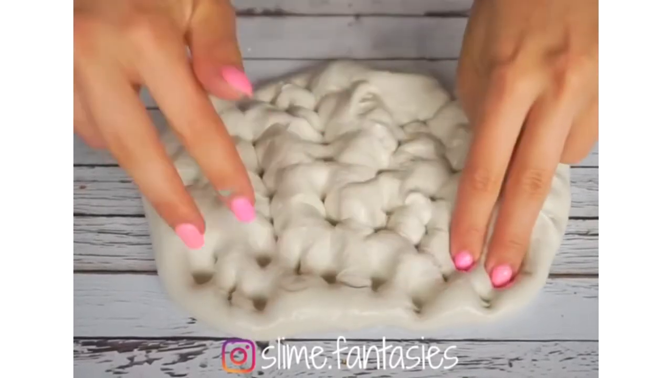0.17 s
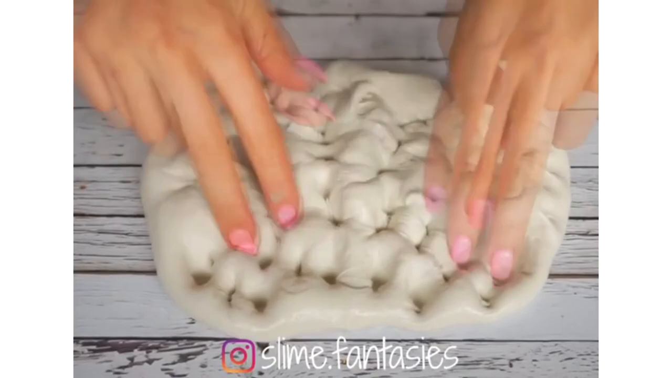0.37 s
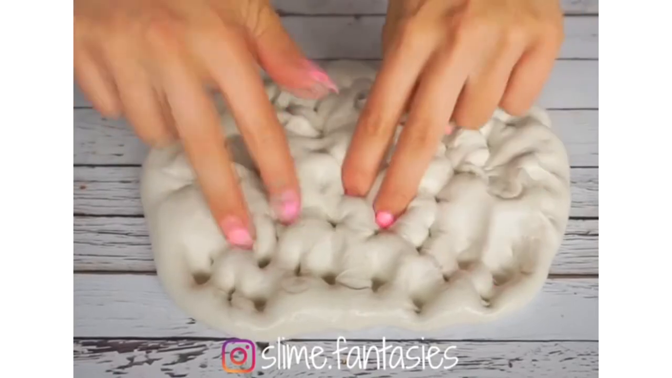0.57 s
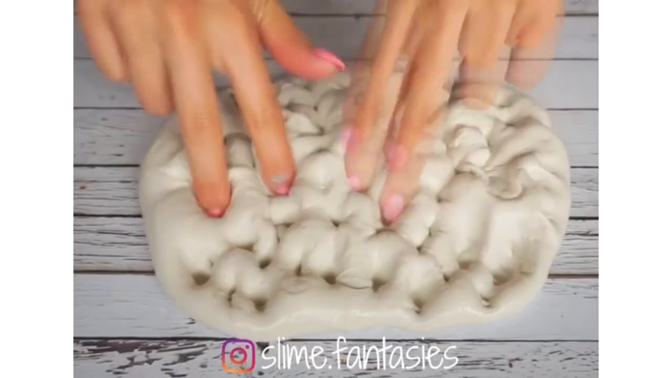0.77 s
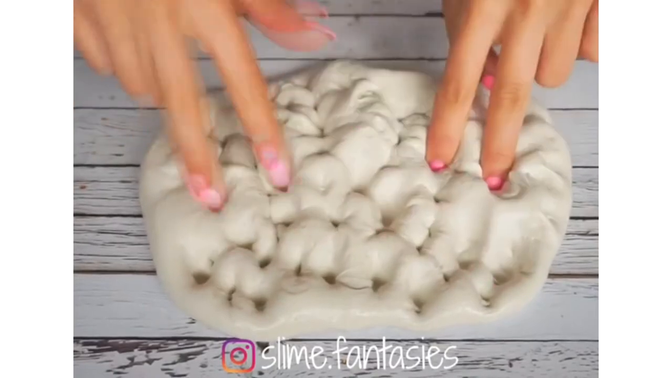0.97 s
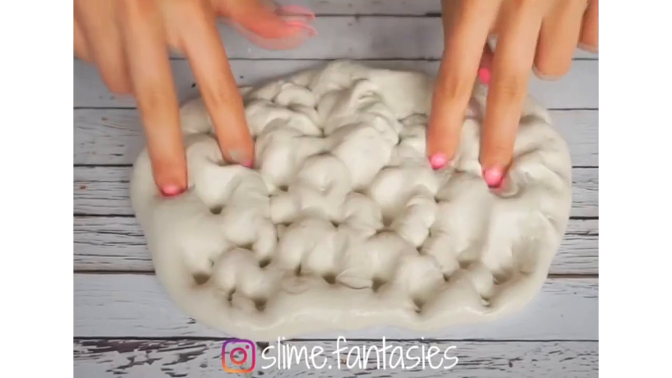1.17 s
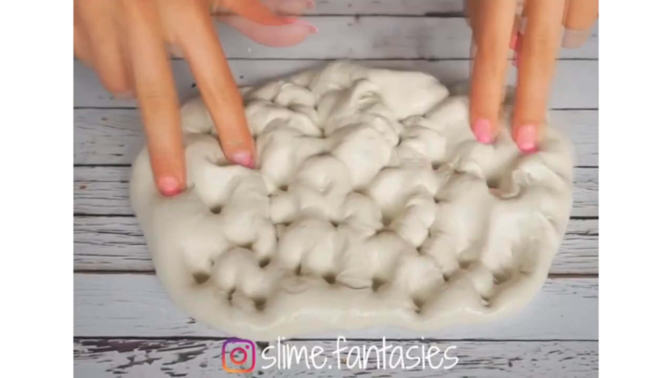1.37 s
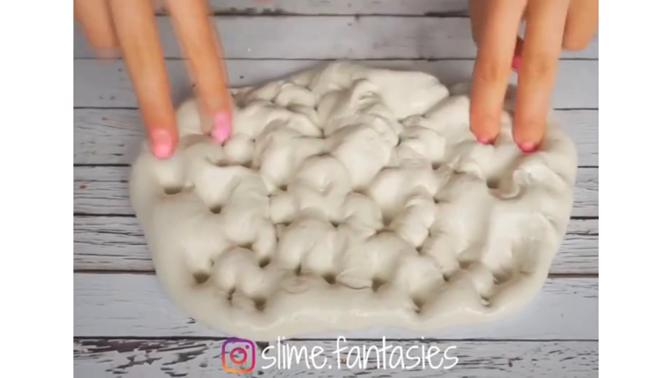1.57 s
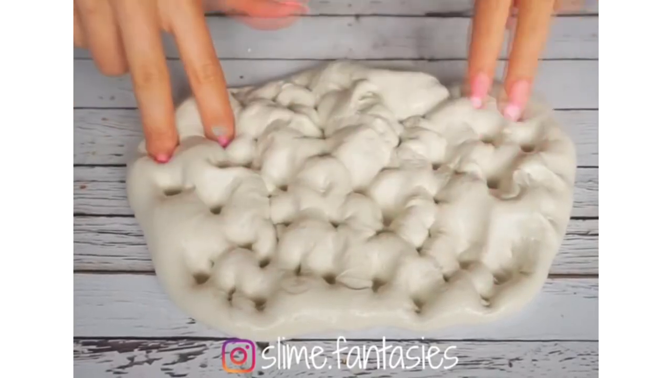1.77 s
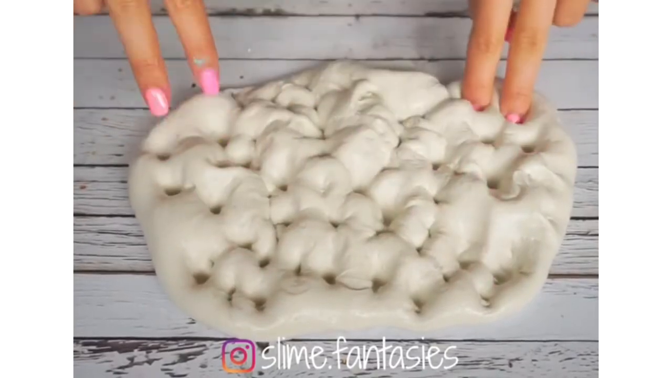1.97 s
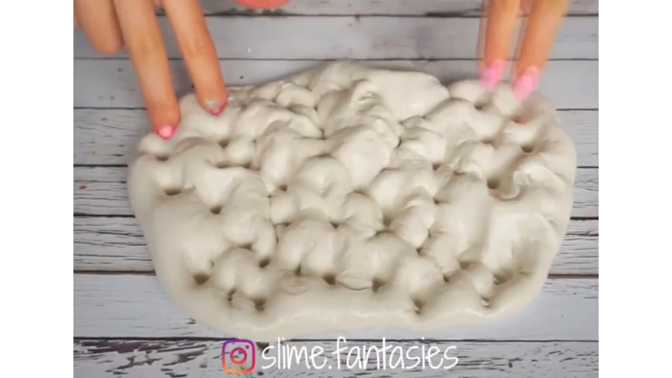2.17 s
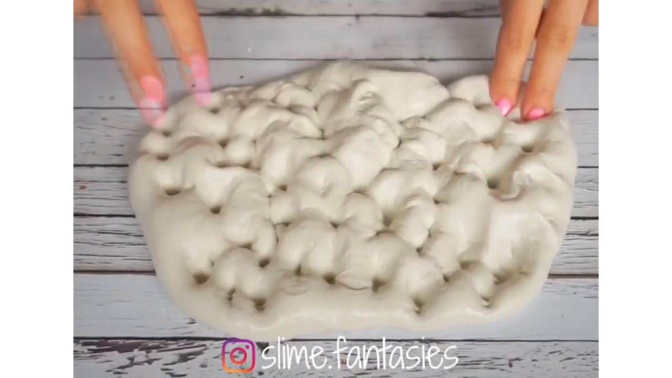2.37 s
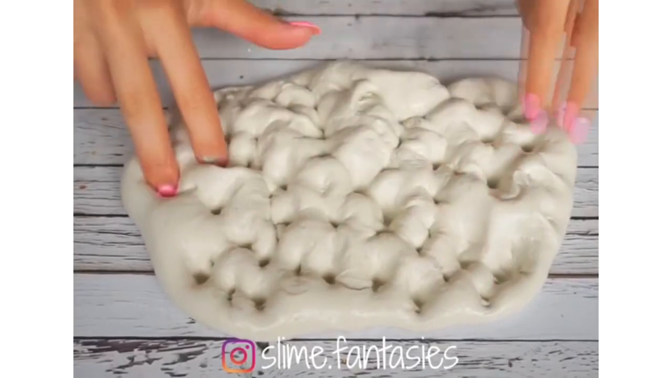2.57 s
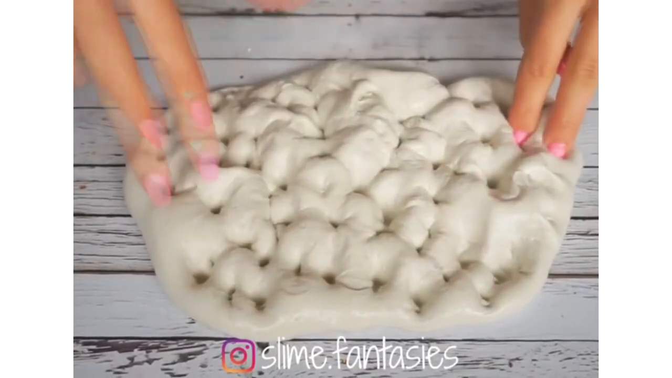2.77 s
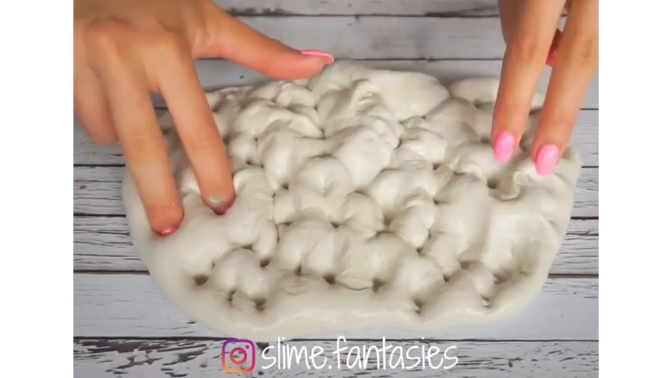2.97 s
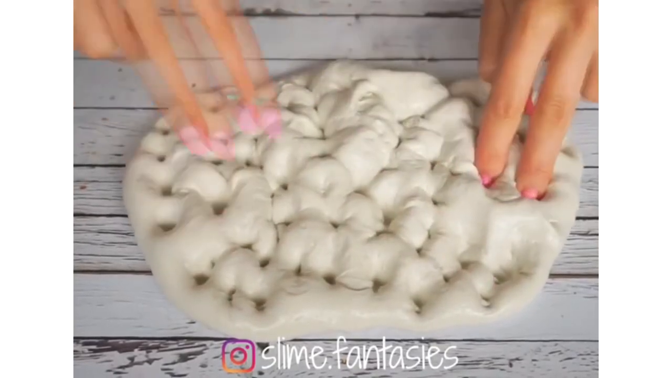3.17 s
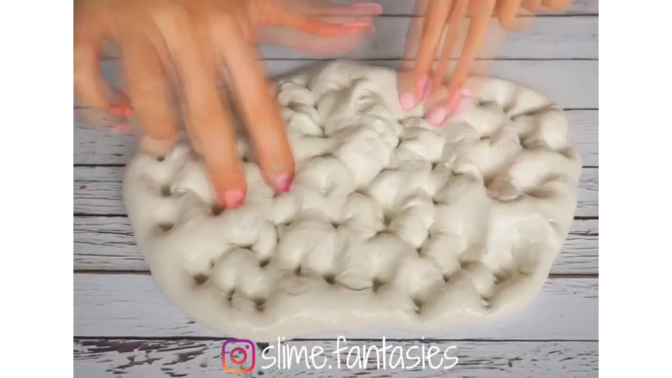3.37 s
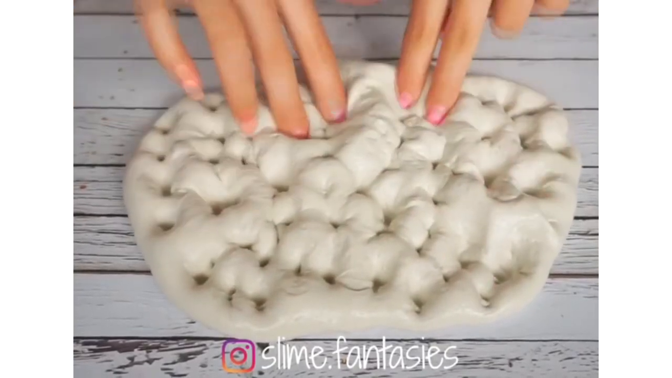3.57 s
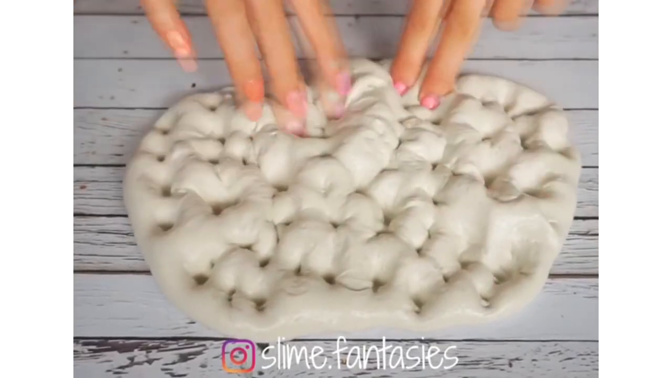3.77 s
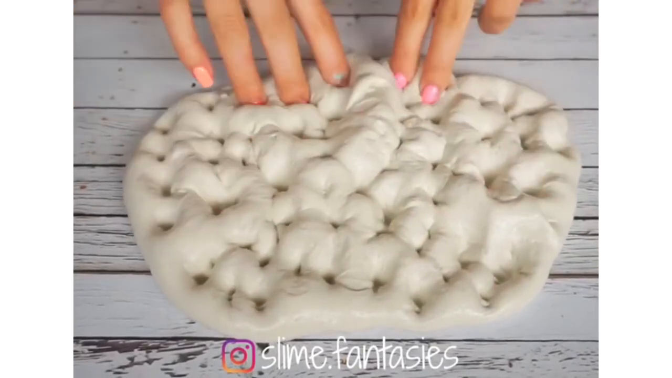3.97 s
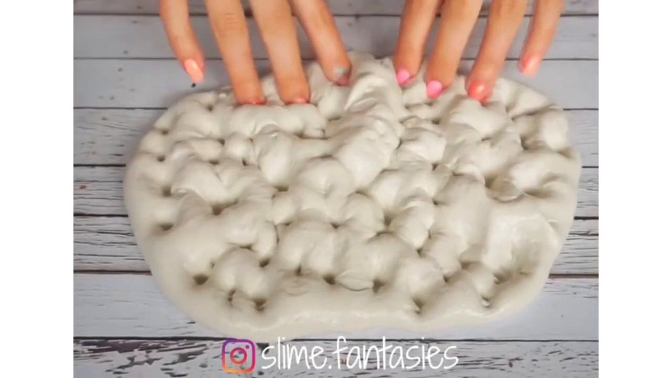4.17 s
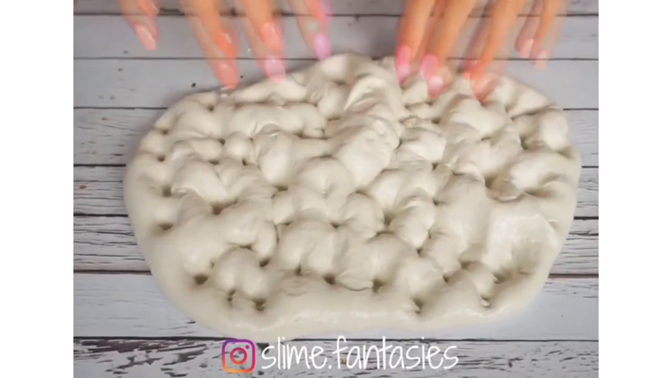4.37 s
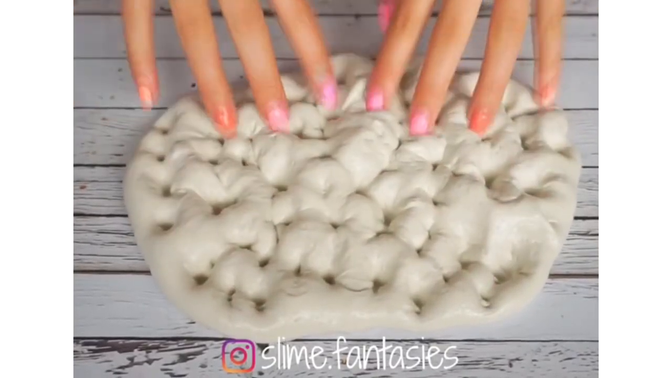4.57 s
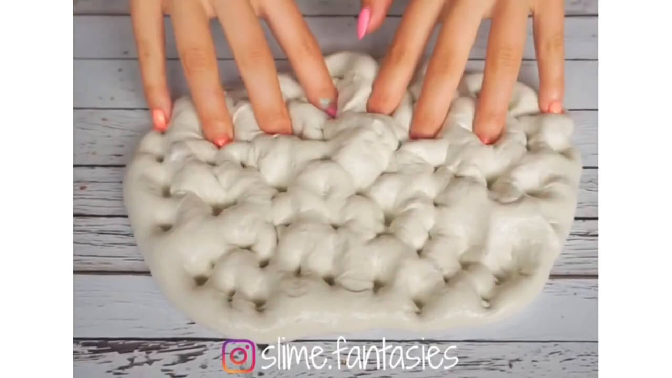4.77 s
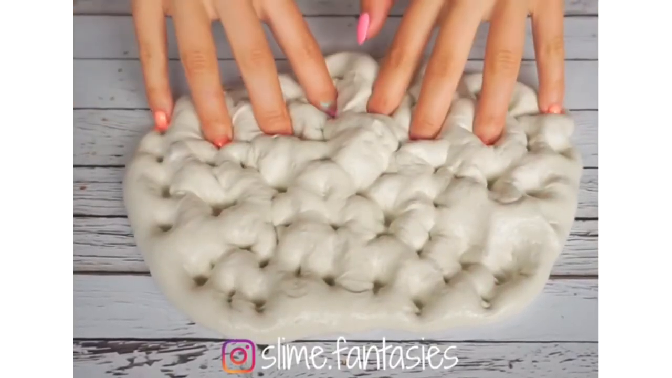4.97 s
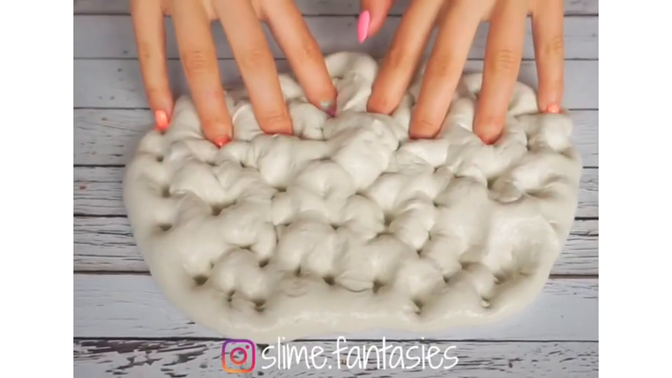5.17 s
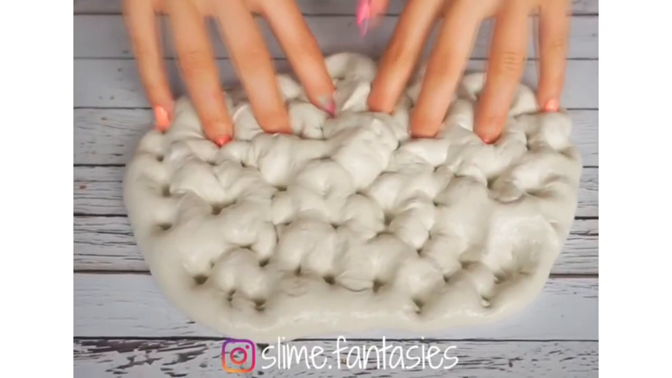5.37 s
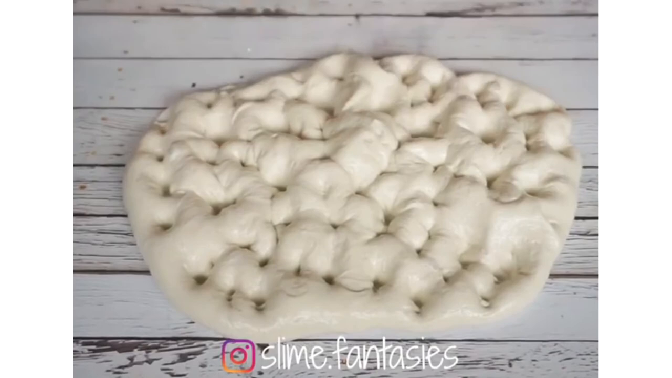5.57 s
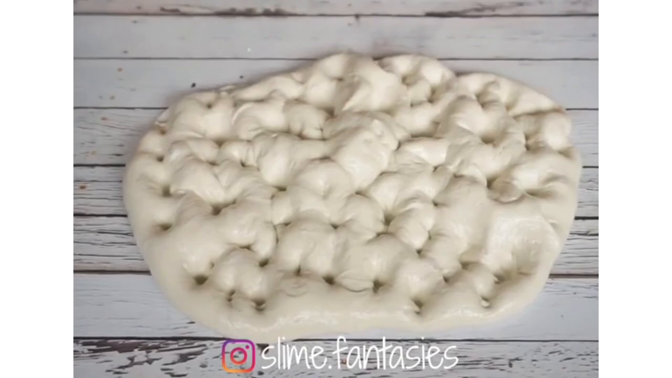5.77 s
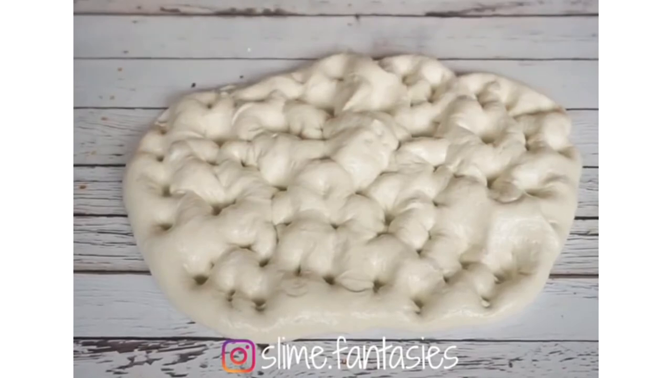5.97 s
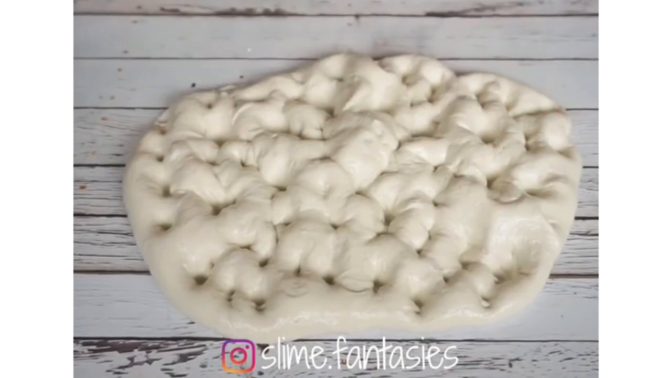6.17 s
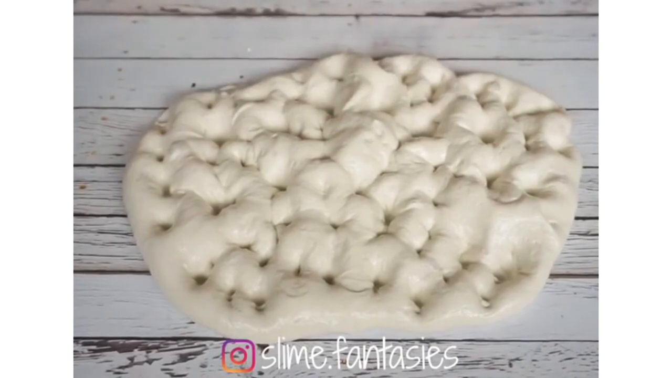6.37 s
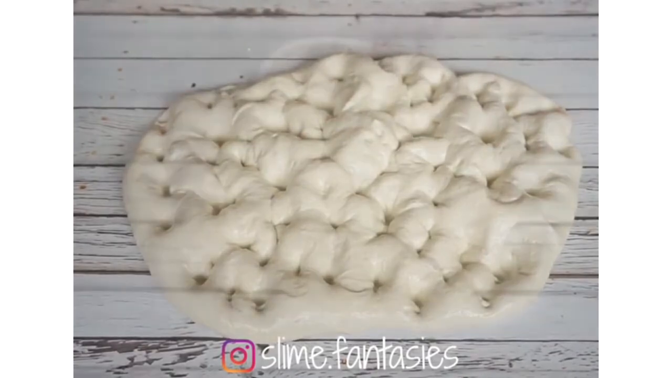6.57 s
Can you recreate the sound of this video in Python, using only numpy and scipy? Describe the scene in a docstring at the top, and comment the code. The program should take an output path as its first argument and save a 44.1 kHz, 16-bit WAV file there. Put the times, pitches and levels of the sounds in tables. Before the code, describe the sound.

Soft, uneven pokes into dense slime: squeezed air gulps downward in pitch, films crackle and fizz, skins snap brightly, and the table top answers with a hollow knock and muffled boom. The steady run stops, a second of near silence follows, then a tight cluster of wet snaps as the fingers leave. Close microphone, dry small room, faint hiss.

```python
"""Poking a slab of slime

Fingertips poke a thick slab of slime on a table, about five times a second, then pull free in a rush.
Each smack and burst is a spit of noise with damped sines; squeezed air is a stream of ringing cavities
whose note sinks amid swelling crackle and fizz. Single bubbles pop, and the push thumps the table as two
low modes. The table top rings along in a small, quiet room with a little rumble and hiss, heard close by."""
import sys
import numpy as np
from scipy import signal
from scipy.fft import rfft, irfft, next_fast_len
from scipy.io import wavfile
from scipy.ndimage import uniform_filter1d

SR = 44100
rng = np.random.default_rng(int(sys.argv[2]) if len(sys.argv) > 2 else 0)


def persist_wave(psi):
    """Save psi, clipped to +-1, as 16-bit WAV."""
    counts = np.round(np.clip(psi, -1, 1) * 32767).astype(np.int16)
    wavfile.write(sys.argv[1], SR, np.atleast_2d(counts).T)


N = 292813  # length in samples

# Event levels below are those of the sources, ahead of fixed gains, the table top and the room.
# A finger meets the slime, squeezes a pocket of air and bursts it; from 5.4 s the fingers pull free in turn.
# Each row: smack in seconds, burst in seconds, stroke in seconds, smack in dB, smack in Hz, snap in dB,
# snap in Hz, air pocket in dB, pocket in Hz, crackle in dB, fizz in dB, thump in dB.
POKE_EVENTS = [(0.1153, 0.1459, 0.058, -51, 900, -21.5, 6390, -33.5, 490, -41.5, -44, -36.5),
               (0.329, 0.347, 0.066, -54, 970, -58, 6400, -47, 502, -53, -55, -38),
               (0.5652, 0.582, 0.062, -37.5, 1860, -34.5, 7000, -34.5, 687, -42, -40.5, -36.5),
               (0.7525, 0.776, 0.045, -20, 2320, -53, 8250, -34.5, 710, -37, -33.5, -42),
               (0.781, 0.803, 0.074, -47, 600, -62, 8000, -36.5, 310, -50.5, -50, -27.5),
               (0.9645, 0.9865, 0.067, -24.5, 3000, -19.5, 8040, -37, 660, -34, -39, -38.5),
               (1.1847, 1.2197, 0.066, -32, 1250, -24.5, 6840, -37.5, 456, -40, -42.5, -43.5),
               (1.422, 1.449, 0.058, -54, 7500, -27, 8760, -48.5, 740, -32.5, -30, -40.5),
               (1.6424, 1.6535, 0.068, -27, 2000, -39, 6300, -35, 575, -33, -41, -41.5),
               (1.8562, 1.8951, 0.042, -21, 2530, -23, 8930, -44, 906, -29.5, -33.5, -36.5),
               (2.0956, 2.1236, 0.061, -32.5, 1260, -37, 6000, -42, 660, -41.5, -51.5, -37.5),
               (2.2627, 2.2811, 0.043, -33.5, 2100, -33, 7470, -28.5, 866, -33, -34, -36.5),
               (2.459, 2.485, 0.075, -53, 2020, -28, 6070, -50, 565, -50.5, -58, -40.5),
               (2.6814, 2.7037, 0.041, -35.5, 650, -48, 5530, -30, 602, -38, -41.5, -47),
               (2.8527, 2.8648, 0.05, -32, 1080, -58, 5950, -38.5, 830, -33.5, -48, -39.5),
               (3.051, 3.086, 0.067, -37.5, 8200, -21.5, 8130, -35.5, 533, -47, -36.5, -38.5),
               (3.22, 3.2325, 0.049, -25.5, 2020, -27, 5300, -34.5, 540, -34.5, -37, -34),
               (3.4068, 3.426, 0.057, -34, 6800, -16.5, 6500, -40.5, 460, -42.5, -41, -38),
               (3.6074, 3.6234, 0.055, -22.5, 1650, -18.5, 5780, -37.5, 575, -35, -44, -42),
               (3.7891, 3.8, 0.053, -27, 2960, -49, 6170, -35.5, 432, -42.5, -43.5, -40.5),
               (3.976, 3.986, 0.087, -47, 2330, -60, 4400, -44.5, 2700, -54.5, -59, -56),
               (4.0152, 4.039, 0.053, -25.5, 2660, -52, 6800, -37.5, 445, -40.5, -38, -36),
               (4.2314, 4.238, 0.093, -27, 750, -43, 8700, -34, 603, -45, -45.5, -32),
               (4.3786, 4.3884, 0.038, -24.5, 2230, -25.5, 6010, -34, 640, -39.5, -41.5, -35.5),
               (5.4162, 5.4277, 0.041, -36.5, 800, -41, 8520, -35, 684, -31, -38, -27),
               (5.432, 5.454, 0.072, -35.5, 1490, -29.5, 7700, -32, 528, -32, -28, -44),
               (5.46, 5.4733, 0.023, -26, 2490, -13.5, 6400, -42.5, 694, -30, -28, -47)]
# Single bubbles that stand out. Each row: start in seconds, ring in dB, ring in Hz, spit in dB.
BUBBLE_POPS = [(0.092, -49, 2900, -43.5), (0.138, -31.5, 820, -36), (0.163, -37.5, 1360, -29),
               (0.524, -47.5, 1970, -54), (0.5525, -51, 2500, -47), (0.7686, -38, 795, -32),
               (0.9705, -31, 2480, -42), (0.9795, -25.5, 1530, -28), (1.2101, -27, 2310, -41),
               (1.388, -45, 1930, -56), (1.431, -51, 3130, -31), (1.439, -31, 1630, -25),
               (1.577, -51.5, 1460, -64), (1.8895, -24, 940, -20), (2.1025, -26.5, 2240, -39),
               (2.2743, -27, 785, -46), (2.291, -30, 760, -35), (2.4756, -39, 644, -37.5),
               (2.4947, -41, 1040, -37), (2.7108, -26, 780, -27), (3.0593, -33, 640, -46),
               (3.0741, -31.5, 1240, -24.5), (3.2286, -24, 2040, -27.5), (3.4189, -30, 2490, -21),
               (3.6156, -24.5, 2900, -27), (3.7748, -41, 2380, -46), (3.7805, -36.5, 4170, -34.5),
               (4.3577, -46, 2340, -47), (4.365, -40, 2240, -37.5), (5.4044, -41, 2350, -36.5),
               (5.4242, -23.5, 2540, -26.5), (5.4594, -27, 840, -30.5)]
# Course of the background. Each row: time in seconds, rumble of the handled table in dB, room hiss in dB.
BACKGROUND_LEVELS = [(0, -58, -64), (2.4, -63, -65.5), (4.4, -54, -62.5), (4.7, -74, -66.5),
                     (5.35, -72.5, -65), (5.52, -52.5, -68.5), (5.749, -82.5, -70.5), (6.1, -82, -66.5)]
# Thin hiss that lingers after a few of the squelches. Each row: start in seconds, level in dB.
LINGERING_HISS = [(3.63, -60.5), (3.8, -53.5), (5.48, -46)]

# Spectrum of the room hiss. Each row: frequency in Hz, relative density in dB per Hz.
HISS_SPECTRUM = [(32, -31.5), (55, -1), (205, -2.5), (265, -3.5), (298, -4.5), (588, -14), (780, -11),
                 (2410, -19.5), (8740, -20.5), (13300, -26.5), (15000, -50.5)]
# Spectrum of the table's rumble. Each row: frequency in Hz, relative density in dB per Hz.
RUMBLE_SPECTRUM = [(15, -3.5), (30, 1), (50, 3), (80, 4.5), (115, -15), (170, -19.5), (400, -47.5)]
# Spectrum of the slime's crackle. Each row: frequency in Hz, relative level in dB.
CRACKLE_SPECTRUM = [(200, -40), (500, -7.5), (900, -1.5), (1500, 2), (2400, 3), (3400, -2), (5000, -10),
                    (10000, -34)]
# Spectrum of the slime's brighter fizz. Each row: frequency in Hz, relative level in dB.
FIZZ_SPECTRUM = [(1000, -24), (3000, -9), (4500, 1), (6500, 0), (8500, 1.5), (10500, -3.5), (13000, -10.5),
                 (16000, -30)]
# Decay of the room. Each row: frequency in Hz, time to fall 60 dB in seconds.
ROOM_DECAY = [(100, 0.094), (500, 0.19), (1500, 0.3), (4000, 0.22), (8000, 0.16), (15000, 0.21)]
# Colour of the room. Each row: frequency in Hz, relative level in dB.
ROOM_COLOUR = [(100, -12), (500, -1), (1500, -3.5), (4000, 1.5), (8000, -3), (15000, -3.5)]
# Resonances of the table top. Each row: frequency in Hz, width in Hz, level in dB.
TABLE_TOP_MODES = [(274, 34, 1.5), (424.3, 22, -1.5), (764, 34, -2.5), (877, 13, -5), (1319, 13, -1),
                   (1460, 28, -8.5), (2230, 36, -4.5), (2826, 42, -14.5)]

TOP_HZ = 15900  # upper limit of the sound's band
POP_T60_S = 0.016  # 60 dB decay of a bubble that rings at least as loud as it spits
TAUT_DB = 21.5  # a tauter skin spits this much more than it rings and dies twice as fast
SPIT_SCATTER = 0.0957  # scatter in log pitch of the snaps within one poke
SMACK_SPIT_DB = -10.5  # a smack's spit over its ring
BURST_RING_DB, BURST_OVER_POCKET = 6, 2.1  # the burst's ring over the crackle, its pitch over the pocket's
SWELL_SHARE = 1.19  # the swell's length over the squeeze's
MIN_FADE_S = 0.01  # a poke fades 20 dB in the rest of its stroke, or in this at least
SINK_SHARE = 0.58  # the pocket's note sinks an octave in this share of the stroke
AHEAD_S = 0.002  # the crackle starts about this long before the smack
THUMP_HZ, THUMP_LAG_S = 81.8, 0.0283  # the boom's middle pitch, and its lag behind the smack


def amp(db):
    """Level law: decibels to an amplitude ratio."""
    return 10 ** (np.asarray(db) / 20)


def unit(x):
    """Normalisation: scale to rms 1."""
    return x / np.sqrt(np.mean(x ** 2) + 1e-20)


def decay(t, t60):
    """Exponential damping: a fall of 60 dB in every t60."""
    return 1000 ** (-t / t60)


def onset(t, time_constant):
    """Exponential build-up towards 1."""
    return 1 - np.exp(-t / time_constant)


def sine(turns):
    """Simple harmonic motion, its phase in turns."""
    return np.sin(2 * np.pi * turns)


def along(points, hz):
    """Interpolation of (Hz, value) points on a log frequency axis."""
    f, v = np.transpose(points)
    return np.interp(np.log(hz + 1), np.log(f + 1), v)


def add(track, s, sound):
    """Superposition: mix a sound into the track from s seconds on."""
    i = max(round(s * SR), 0)
    part = track[i:i + len(sound)]
    part += sound[:len(part)]


def coloured(x, spectrum, size=8192):
    """Minimum-phase filtering: folding the cepstrum makes the given spectrum causal."""
    log_gain = np.log(amp(along(spectrum, np.fft.rfftfreq(size, 1 / SR))))
    cepstrum = irfft(log_gain)
    cepstrum[1:size // 2] *= 2
    cepstrum[size // 2 + 1:] = 0
    impulse_response = irfft(np.exp(rfft(cepstrum)))
    return signal.fftconvolve(x, impulse_response)[:len(x)]


def noise(spectrum):
    """Stationary random noise, shaped by a spectrum, of rms 1."""
    return unit(coloured(rng.standard_normal(N), spectrum))


def wobble(rate):
    """Slow random fluctuation: straight lines between random knots, rate of them a second."""
    knots = rng.standard_normal(N // 8)
    return np.interp(np.arange(N) * rate / SR, np.arange(len(knots)), knots)


def background():
    """Steady noise under slow level curves: room hiss, and the table's rumble under the working hands."""
    s, *levels = np.transpose(BACKGROUND_LEVELS)
    rumble_db, hiss_db = [np.interp(np.arange(N) / SR, s, level) for level in levels]
    return amp(rumble_db) * noise(RUMBLE_SPECTRUM) + amp(hiss_db) * noise(HISS_SPECTRUM)


def bursting():
    """Impulsive events: single bubbles, then each poke's smack and burst (s, ring dB, ring Hz, spit dB)."""
    yield from BUBBLE_POPS
    for touch, s, _, smack_db, smack_hz, snap_db, _, _, pocket_hz, crackle_db, *_ in POKE_EVENTS:
        yield touch, smack_db, smack_hz, smack_db + SMACK_SPIT_DB
        yield s, crackle_db + BURST_RING_DB, pocket_hz * BURST_OVER_POCKET, snap_db


def pops(partner_hz=1400, partner_db=-5, crack_db=-7, hiss_db=-4, snap_db=4, snap_life=0.63, attack=0.00021):
    """Damped resonance: a skin snaps with a bright spit; its cavity and a neighbour ring for a few cycles."""
    out, t = np.zeros(N), np.arange(SR // 20) / SR
    hiss, crack = noise(FIZZ_SPECTRUM), noise(CRACKLE_SPECTRUM)
    # the wet skin never holds a steady pitch (phase in radians)
    waver = 1.3 * wobble(2500)
    for s, ring_db, ring_hz, spit_db in bursting():
        t60 = POP_T60_S * 2 ** (-max(spit_db - ring_db, 0) / TAUT_DB)
        # all snaps of one poke come from the same skin
        nearest_poke = min(POKE_EVENTS, key=lambda poke: abs(poke[1] - s))
        spit_hz = nearest_poke[6] * np.exp(rng.normal(0, SPIT_SCATTER))
        neighbour_hz = partner_hz * np.exp(rng.normal(0, 0.22))
        start = round(s * SR)
        here = slice(start, start + len(t))
        ring = sine(ring_hz * t) + amp(partner_db) * sine(neighbour_hz * t)
        # the snap's own decay multiplies that of the whole pop
        snap = amp(snap_db) * np.sin(2 * np.pi * spit_hz * t + waver[here]) * decay(t, snap_life * t60)
        cavity = amp(ring_db) * (ring + amp(crack_db) * crack[here])
        spit = amp(spit_db) * (amp(hiss_db) * hiss[here] + snap)
        add(out, s, (cavity + spit) * decay(t, t60) * onset(t, attack))
    return out


def grains(spectrum, rate, spread_db):
    """Shot noise: a random stream of tiny bursts of uneven size, rms 1."""
    sizes = amp(spread_db * np.minimum(rng.exponential(size=N), 3)) * rng.choice([-1, 1], N)
    struck = rng.random(N) < rate / SR
    return unit(coloured(sizes * struck, spectrum))


def swell(t, rise, fall):
    """Exponential growth and decay of the air flow around t = 0; rise and fall each span 20 dB."""
    return 10 ** -np.where(t < 0, -t / rise, t / fall)


def bubbles(note, rate, scatter, cycles, opening):
    """Cavity resonance: a random stream of small ringing cavities near the note (Hz per sample), rms near 1."""
    t = np.arange(SR // 40) / SR
    starts = np.flatnonzero(rng.random(len(note)) < rate / SR)
    pitch = (note[starts] * np.exp(scatter * rng.standard_normal(len(starts))))[:, None]
    push = rng.choice([-1, 1], pitch.shape) * np.sqrt(pitch)
    turns = pitch * t
    # decay and onset are counted in cycles
    rings = push * sine(turns) * decay(turns, cycles) * onset(turns, opening)
    places = starts[:, None] + np.arange(len(t))
    stream = unit(np.bincount(places.ravel(), rings.ravel(), len(note))[:len(note)])
    # level out the random stream over short spans
    power = np.abs(uniform_filter1d(stream ** 2, SR // 80))
    return stream / np.sqrt(power + .05)


def gulps(u, hz, sink):
    """Cavity resonance: air leaves a pocket in small gulps, each ringing near the pocket's sinking note."""
    note = hz * 2 ** np.clip(-u / sink, -1.05, .5)
    return bubbles(note, rate=650, scatter=0.22, cycles=7.4, opening=0.22)


def squelches(pocket_lag=0.003, stop=0.047, foam_hz=1650, foam_db=-4, film_db=-4.0):
    """Cavity resonance and shot noise: pockets gulp air, foam bursts, slime films tear into crackle and fizz."""
    out, t = np.zeros(N), np.arange(N) / SR
    films = grains(CRACKLE_SPECTRUM, rate=2200, spread_db=2.0)
    fizz = grains(FIZZ_SPECTRUM, rate=2200, spread_db=2.5)
    # sticky films give way in little clusters
    clusters = unit(amp(2.67 * wobble(450)))
    for touch, s, stroke, *_, pocket_db, hz, crackle_db, fizz_db, _ in POKE_EVENTS:
        rise = SWELL_SHARE * (s - touch)
        fall = max(stroke - rise, MIN_FADE_S)
        near = slice(max(round((s - .08) * SR), 0), round((s + .12) * SR))
        u = t[near] - s  # seconds from the burst
        # the noise lasts only while the finger is moving through the slime
        moving = 1 / (1 + (np.where(u < 0, u / (s - touch + AHEAD_S), u / stop)) ** 10)
        foam = bubbles(np.full(len(u), foam_hz), rate=600, scatter=0.394, cycles=18.0, opening=0.17)
        crackle = amp(foam_db) * foam + amp(film_db) * films[near]
        tearing = amp(crackle_db) * crackle + amp(fizz_db) * fizz[near]
        tearing = tearing * clusters[near] * swell(u, rise, fall)
        pocket = amp(pocket_db) * gulps(u, hz, SINK_SHARE * stroke) * swell(u - pocket_lag, rise, fall)
        out[near] += moving * (tearing + pocket)
    return out


def radiated(x, corner_hz=170):
    """Radiation efficiency: small cavities give off hardly any bass."""
    return signal.sosfilt(signal.butter(2, corner_hz, "high", fs=SR, output="sos"), x)


def board(x):
    """Modal response: the table top answers the slime with a few hollow resonances."""
    m = next_fast_len(N + SR // 2)
    f = np.fft.rfftfreq(m, 1 / SR)
    response = 0
    for hz, width, db in TABLE_TOP_MODES:
        damping = 1j * f * width
        response = response + amp(db) * damping / (hz ** 2 - f ** 2 + damping)
    return irfft(rfft(x, m) * response, m)[:N]


def room(x, wet_db=-15, build=0.0024):
    """Reverberation: a short noise tail in which each frequency dies at its own speed."""
    hz, t, z = signal.stft(rng.standard_normal(SR // 3), SR, nperseg=256)
    fade = decay(t, along(ROOM_DECAY, hz)[:, None]) * onset(t, build)
    tail = signal.istft(z * fade, SR, nperseg=256)[1]
    tail = tail / np.linalg.norm(tail)
    return amp(wet_db) * coloured(signal.fftconvolve(x, tail)[:N], ROOM_COLOUR)


def table(t60=0.17, attack=0.021, upper_hz=112, upper_db=-10, gain_db=7):
    """Modal excitation: the soft push of a finger sets two low modes of the table top booming briefly."""
    out, t = np.zeros(N), np.arange(SR // 2) / SR
    for touch, *_, db in POKE_EVENTS:
        boom_hz = THUMP_HZ * np.exp(rng.normal(0, 0.036))
        modes = sine(boom_hz * t) + amp(upper_db) * sine(upper_hz * t + rng.random())
        add(out, touch + THUMP_LAG_S, amp(db + gain_db) * modes * decay(t, t60) * onset(t, attack))
    return out


def after_hiss(t60=.28):
    """Exponentially decaying narrow noise: a thin hiss lingers after a few of the squelches."""
    level, t = np.zeros(N), np.arange(SR // 2) / SR
    # (Hz, relative dB)
    thin = noise([(2000, -34.0), (3100, -3.5), (3650, 11.5), (4700, 3.0), (5300, -16.5), (8000, -34)])
    for s, db in LINGERING_HISS:
        add(level, s, amp(db) * decay(t, t60))
    return level * thin


def scene():
    """Superposition: slime through the table top and the room, with thumps, lingering hiss and background."""
    slime = radiated(squelches() + pops())
    slime = slime + board(slime)
    return (slime + room(slime) + table() + after_hiss() + background())[None]


def record(dry):
    """Band limitation: nothing sounds above the top frequency."""
    m = next_fast_len(N + SR // 2)
    kept = np.fft.rfftfreq(m, 1 / SR) < TOP_HZ
    return irfft(rfft(dry, m) * kept, m)[..., :N]


dry = scene()
out = record(dry)
persist_wave(out)
```